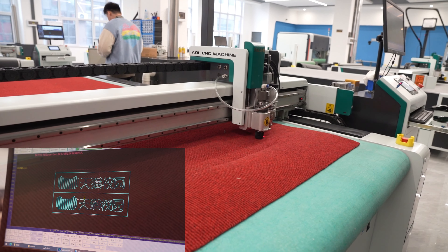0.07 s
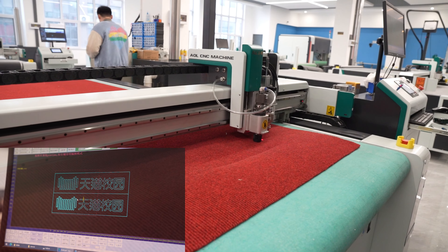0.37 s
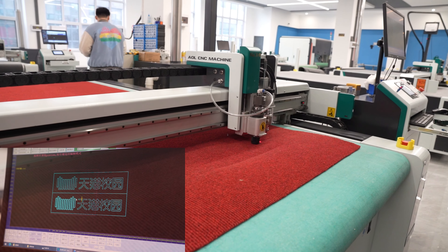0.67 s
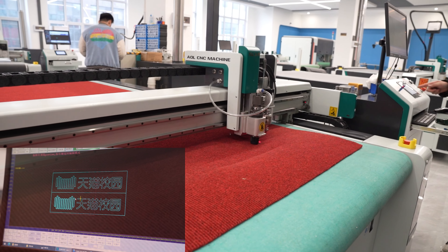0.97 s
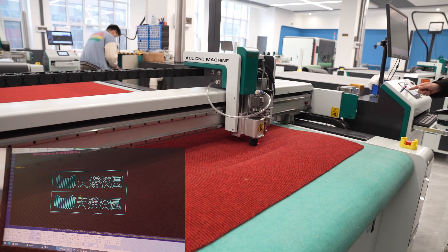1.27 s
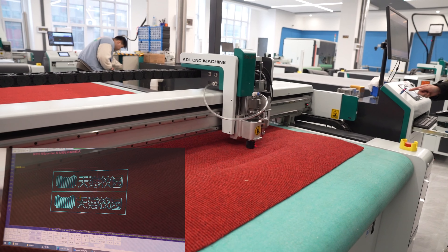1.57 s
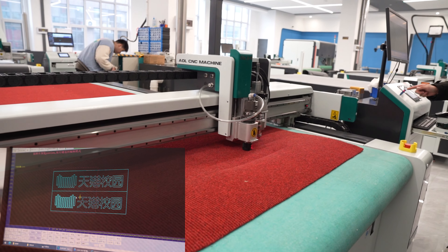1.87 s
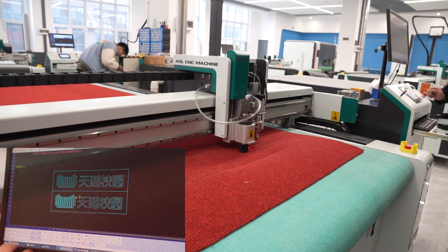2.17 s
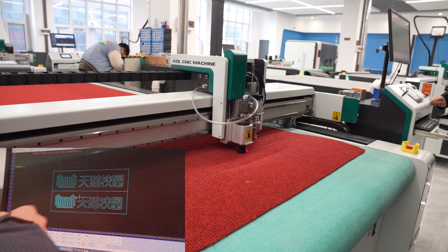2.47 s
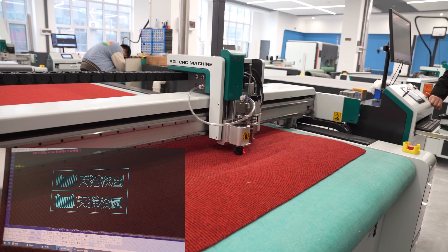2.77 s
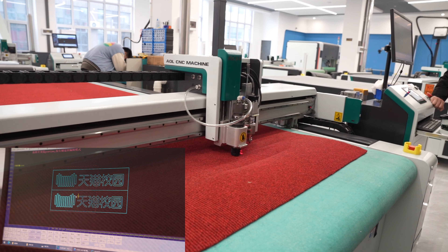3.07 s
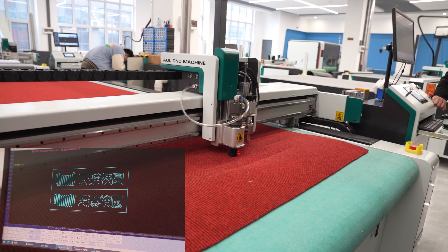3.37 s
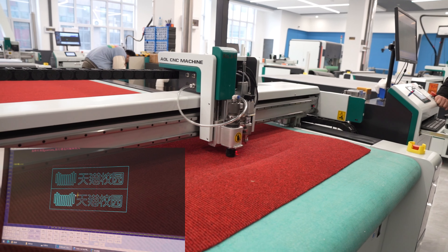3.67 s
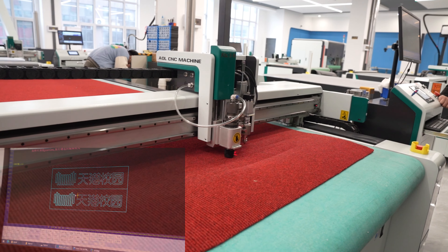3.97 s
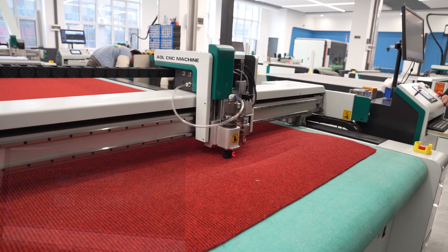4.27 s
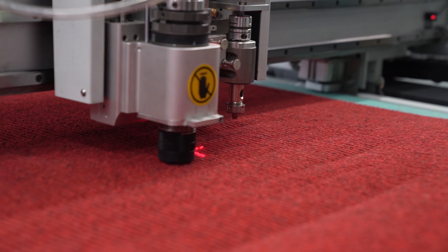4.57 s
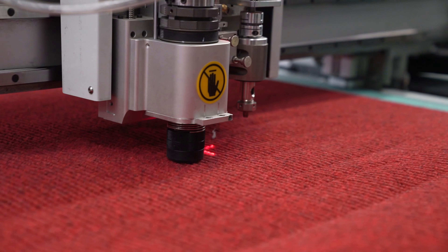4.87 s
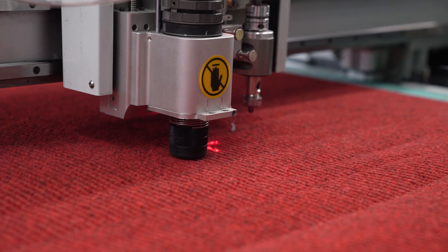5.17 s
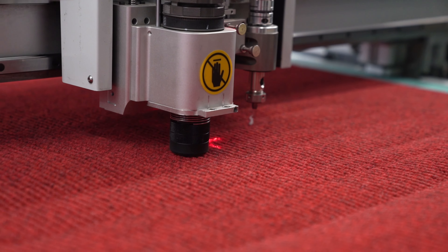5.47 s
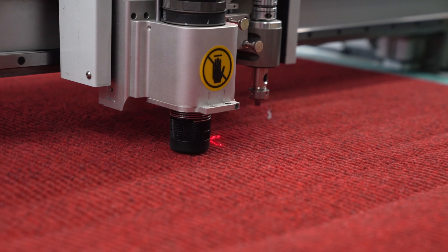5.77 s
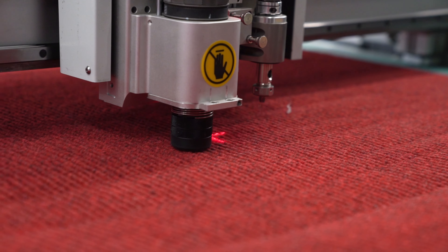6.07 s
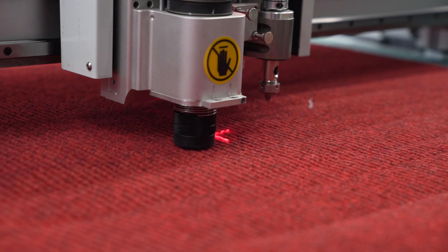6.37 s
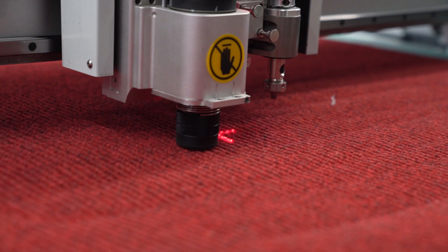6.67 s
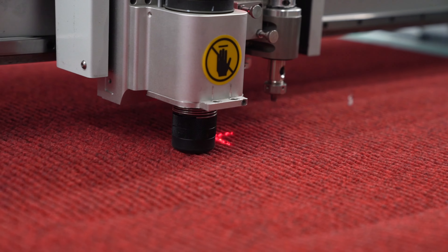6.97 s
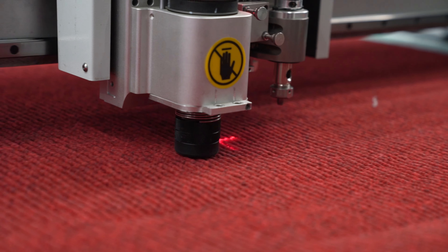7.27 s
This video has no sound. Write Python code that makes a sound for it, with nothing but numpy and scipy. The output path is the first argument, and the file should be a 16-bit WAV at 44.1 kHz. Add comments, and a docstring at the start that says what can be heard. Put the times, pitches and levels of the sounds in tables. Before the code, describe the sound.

In a workshop, a flatbed cutter's oscillating knife buzzes through carpet with a slight fast throb, over a steady bright air hiss and a low vacuum rush. Heard from beside the table, the buzz is reverberant and slowly brightens, and the blade gives a few thin squeaks. A little past halfway the sound dips for an instant, then continues close to the cutting head, drier and more distinct.

```python
"""Flatbed cutter on carpet

An oscillating knife buzzes at about 196 strokes a second, its rate hunting about ten times a second.
Air hisses at the head, the vacuum bed rumbles and the blade squeaks in a turn. The cutter is heard
from beside the table in a workshop, then, after a brief dip in level, from close to the head."""
import sys
import numpy as np
from scipy import signal
from scipy.fft import rfft
from scipy.io import wavfile
from scipy.ndimage import uniform_filter1d

SR = 44100
rng = np.random.default_rng(int(sys.argv[2]) if len(sys.argv) > 2 else 0)


def master(y):
    """Save y as 16-bit WAV."""
    cut = np.clip(np.atleast_2d(y).T, -1, 1)
    pcm = np.round(cut * 32767)  # scale
    wavfile.write(sys.argv[1], SR, pcm.astype(np.int16))


N = 323253
TIME = np.arange(N) / SR


def amp(db):
    """Decibels to gain."""
    return 10 ** (np.asarray(db) / 20)


def unit(x):
    """Scale to rms 1."""
    return x / np.sqrt(np.mean(x ** 2) + 1e-20)


def bell(x, centre, width):
    """Gaussian bump of height 1."""
    return np.exp(-2 * ((x - centre) / width) ** 2)


def at_hz(points, hz):
    """Interpolate a spectrum on a log-frequency axis."""
    f, value = np.transpose(points)
    return np.interp(np.log(hz + 1), np.log(f + 1), value)


def curves(rows):
    """Interpolate each column of a timed table per sample."""
    times, *columns = np.transpose(rows)
    return [np.interp(TIME, times, column) for column in columns]


def wander(hz):
    """Smooth random drift of rms 1, bandwidth about hz."""
    times = TIME[::64]
    f = np.fft.rfftfreq(len(times), times[1])
    spectrum = rfft(rng.standard_normal(len(times))) * np.exp(-(f / hz) ** 2)
    return np.interp(TIME, times, unit(np.fft.irfft(spectrum, len(times))))


def panned(db):
    """Stereo gains for a left-minus-right level."""
    return amp(np.array([np.atleast_1d(db), -np.atleast_1d(db)]) / 2)


# Workshop decay: freq_hz, t60_s
ROOM_DECAY = [(200, 1), (1000, 1), (4000, 0.15)]
# Reflection spectrum: freq_hz, relative_db
ROOM_COLOUR = [(200, -104), (500, 22.5), (1000, 28.5), (2000, 31.5)]


def workshop(source):
    """Dense reflections, different at each ear; bass enters weakly, treble dies first."""
    taps = rng.standard_normal((2, SR // 2)) * (rng.random((2, SR // 2)) < .05)
    hz, age_s, bands = signal.stft(taps, nperseg=256, fs=SR)
    decay = np.exp(-np.log(1000) * age_s / at_hz(ROOM_DECAY, hz)[:, None])
    bands *= amp(at_hz(ROOM_COLOUR, hz))[:, None] * decay
    tail = signal.istft(bands, nperseg=256)[1]
    return signal.fftconvolve(source.mean(0)[None], tail / np.linalg.norm(tail[0]), axes=1)[:, :N]


# Air noise likeness between the ears: freq_hz, correlation
AIR_COHERENCE = [(60, 0.35), (130, 1), (260, 1), (500, 0.92), (1000, 1), (2500, 0.81), (5000, 0.41),
                 (9000, 0.45), (12000, 0.26), (15000, 0.54)]
# Air noise balance: freq_hz, left_minus_right_db
AIR_BALANCE = [(300, 0), (1000, -.4), (4000, 1), (6300, -.6), (8500, -1.8), (12500, 1.3)]


def air_noise(spectrum, patchy_db, drift_db, peaks=()):
    """Turbulent stereo noise with quick patches; shifting reflections slowly ripple its colour."""
    frames, hz = N // 256 + 5, np.fft.rfftfreq(1024, 1 / SR)
    left_re, left_im, other_re, other_im, patches, drift = rng.standard_normal((6, frames, len(hz)))
    patches = unit(uniform_filter1d(uniform_filter1d(patches, size=9, axis=0), size=30, axis=1))
    drift = unit(uniform_filter1d(uniform_filter1d(drift, size=160, axis=0), size=5, axis=1))
    coherence = np.clip(at_hz(AIR_COHERENCE, hz), 0, 1)
    left = left_re + 1j * left_im
    right = coherence * left + np.sqrt(1 - coherence ** 2) * (other_re + 1j * other_im)
    colour_db = at_hz(spectrum, hz) + sum(db * bell(hz, centre, width) for centre, width, db in peaks)
    bands = np.array([left, right]) * amp(colour_db + patchy_db * patches + drift_db * drift)
    bands *= panned(at_hz(AIR_BALANCE, hz))[:, None]
    noise = signal.istft(bands.transpose(0, 2, 1), nperseg=1024, noverlap=768)[1][:, :N]
    return noise / np.std(noise.mean(0))


# Air flow, for blower and hiss: time_s, level_db
AIR_FLOW = [(0, -19), (4.3, -18.5), (4.55, -20.5), (5.7, -18.5), (6.25, -22.5), (7.3, -20.5)]
# Blower and duct spectra: freq_hz, relative_db
VACUUM_FAR = [(30, -39), (75, -32), (100, -35), (135, -16.5), (185, 0), (280, -3.3), (350, -8.5),
              (500, -11), (750, -13), (1300, -10), (1850, -11), (2300, -7), (3000, -15), (3800, -35)]
VACUUM_NEAR = [(30, -39), (75, -33), (100, -30), (130, -11), (190, 0), (240, -2.3), (340, -3.8), (520, -12),
               (900, -14), (1400, -7), (1850, -8), (2400, -5.5), (3000, -11), (3800, -33)]


def blower(spectrum):
    """The vacuum's low rush follows the air flow."""
    return amp(curves(AIR_FLOW)[0]) * air_noise(spectrum, patchy_db=.7, drift_db=.8)


# Hiss spectra: freq_hz, relative_db
HISS_COLOUR_FAR = [(1650, -56), (2800, -7.5), (3400, -12.5), (3950, -5.5), (4450, -9), (5000, -6),
                   (7000, -4), (8250, -5.5), (8800, 0.5), (10000, 0.5), (11900, -2), (13200, -1.5),
                   (15000, -5.5), (15700, -5)]
HISS_COLOUR_NEAR = [(1650, -28), (2900, -14.5), (4100, -7.5), (4700, -9), (5600, -5.5), (6500, -3),
                    (7000, -6.5), (8750, -6), (9100, -2.5), (10300, -0.5), (10800, -3.5), (12500, -2.5),
                    (14600, -2.5), (15700, -14)]
# Narrow bright bands: centre_hz, width_hz, lift_db
HISS_PEAKS_FAR = [(5920, 160, 3), (7680, 610, 3), (8850, 450, 0.5), (11070, 220, 1.5), (12280, 260, 6.5),
                  (13600, 600, 3.5), (14400, 300, 3)]
HISS_PEAKS_NEAR = [(5900, 210, 1.4), (7760, 410, 2), (9500, 410, 2.3), (10770, 210, 2.9), (11280, 400, 5.7),
                   (12550, 380, 3.3), (14500, 390, 2.2)]
# Hiss position, right of centre: time_s, left_minus_right_db
HISS_PAN = [(0, -4.8), (2.5, -4.2), (4.2, -3.3), (4.55, -2), (5.7, -1.3), (7.3, -1.3)]


def hiss(spectrum, peaks, strokes, hunt):
    """Air rushes at the head, pulsing faintly with the strokes and the hunting drive."""
    level_db = curves(AIR_FLOW)[0] - .3 * hunt + .25 * wander(30)
    flow = amp(level_db) * (1 + .035 * np.cos(2 * np.pi * strokes))
    noise = air_noise(spectrum, patchy_db=.72, drift_db=1.17, peaks=peaks)
    return flow * panned(curves(HISS_PAN)[0]) * noise


# Blade squeaks: centre_s, width_s, level_db
SQUEAKS = [(2.99, .04, -32), (3.08, .06, -33), (3.17, .035, -25.5)]
# Squeak spectrum: freq_hz, relative_db
SQUEAK_COLOUR = [(3000, -34), (3720, -3), (3900, 5), (4120, -12), (4700, -2), (5500, -39)]


def squeaks():
    """The blade rubs in a turn: short, thin bursts of noise."""
    rub = sum(amp(db) * bell(TIME, centre, width) for centre, width, db in SQUEAKS)
    return rub * air_noise(SQUEAK_COLOUR, patchy_db=1, drift_db=1.5)


STROKE_HZ, HUNT_HZ, HUNT_SWING_HZ = 196.2, 10.56, 1.55
# Heavy stretches of the cut: centre_s, width_s, sag_hz
LOAD_SAGS = [(.9, .15, 1.2), (1.92, .3, 2.2), (4.5, .6, .6), (5.8, .2, .7)]


def drive():
    """The stroke rate hunts and sags under load; returns the running stroke count and hunting cycle."""
    hunt = np.cos(2 * np.pi * (HUNT_HZ * TIME + .17))
    swing_hz = HUNT_SWING_HZ * hunt * (1 + .25 * wander(3))
    jitter_hz = .65 * wander(16) + .9 * wander(100)
    sag_hz = sum(hz * bell(TIME, centre, width) for centre, width, hz in LOAD_SAGS)
    return np.cumsum(STROKE_HZ - sag_hz + swing_hz + jitter_hz) / SR, hunt


# Spectrum of one stroke: harmonic, relative_db
KNOCK_FAR = [(1, -17), (2, -5.5), (3, -1.9), (4, -1.6), (5, 1), (6, 2.1), (7, -3), (8, -.3), (9, -5.2),
             (10, -5.3), (11, -5.2), (12, -8), (13, -6.5), (14, -11.7), (15, -13.5), (16, -15.7), (17, -18),
             (18, -18.4), (19, -17.4), (20, -15.3)]
KNOCK_NEAR = [(1, -14.8), (2, -0.3), (3, -2.5), (4, .8), (5, -3), (6, -.1), (7, .5), (8, -2.8), (9, -2.7),
              (10, -1.6), (11, -7.3), (12, -9.8), (13, -10.3), (14, -14.8), (15, -18.0), (16, -17.5),
              (17, -17.1), (18, -18.4), (19, -20.8), (20, -19.9)]
# Broad ring, sliding as the head travels and turns: time_s, centre_hz, gain_db
RING_PATH_FAR = [(0, 600, 0), (.5, 610, 0.5), (1.15, 820, 2), (1.6, 905, -3), (2.35, 863, 10.5),
                 (2.75, 1120, -4), (3.2, 1370, 4), (3.8, 1340, 8), (4.15, 1420, -1)]
RING_PATH_NEAR = [(4.5, 760, 5.5), (5.15, 800, 3), (5.55, 1250, -5.5), (5.85, 1290, 7), (6.25, 1370, 6),
                  (6.9, 1420, 4), (7.0, 960, 6), (7.3, 980, 4)]
# Lowest (hum) and highest (rasp) partials: time_s, level_db
HUM_LEVEL = [(0, -35), (2.4, -45), (3.85, -36.5), (4.05, -31), (5.45, -35.5), (5.7, -39), (6.9, -35.5),
             (7.25, -30)]
RASP_LEVEL = [(0, -31.5), (3.5, -31.5), (4.9, -32), (5.65, -29), (6.1, -34.5), (7.2, -30.5)]
# The knife bites harder or eases off: centre_s, width_s, gain_db
KNIFE_BITES = [(.7, .06, 2.5), (1.12, .06, 3), (1.85, .05, 2), (2.25, .3, 1.2), (2.54, .06, 2.5),
               (2.77, .04, -3), (2.83, .04, 3.5), (3.02, .08, 3), (3.49, .05, 4), (3.8, .12, 2),
               (4.1, .2, -2), (4.34, .035, 7.5), (4.67, .025, -3), (4.9, .3, 1.5), (5.55, .4, -4),
               (7.3, .3, -3)]


def partial_levels(knock, ring, body_db, hum_db, rasp_db, trough_db=0, tilt_db_per_octave=0):
    """Yield (harmonic, level_db); the sliding ring, bites and cloth drag shape the middle partials."""
    ring_hz, ring_db = curves(ring)
    hum, rasp = curves(HUM_LEVEL)[0] + hum_db, curves(RASP_LEVEL)[0] + rasp_db
    bite_db = sum(db * bell(TIME, centre, width) for centre, width, db in KNIFE_BITES)
    load_db = bite_db + .65 * wander(hz=14)  # surges from the cloth's drag
    for harmonic, colour_db in knock:
        hz = harmonic * STROKE_HZ
        if harmonic <= 2:
            level_db = hum
        elif harmonic >= 11:
            level_db = rasp
        else:
            ringing_db = ring_db * bell(hz, ring_hz, width=204)
            # A reflection off the table cancels partials just below the ring.
            cancelled_db = trough_db * bell(hz, ring_hz - 365, width=170)
            tilt_db = tilt_db_per_octave * np.log2(hz / 1080)
            level_db = body_db + ringing_db + cancelled_db + tilt_db
        yield harmonic, colour_db + level_db + load_db * bell(harmonic, centre=6.9, width=3.7)


def knife(strokes, hunt, partials, smear_rad, spread_rad, roughness, throb_db):
    """One knock a stroke, smeared by nearby reflections; the cloth's drag makes the knocks uneven."""
    buzz = np.zeros((2, N))
    for harmonic, level_db in partials:
        # Reflections shift the phase as the head moves; high partials differ more between the ears.
        ear_phase = np.array([[1], [-1]]) * spread_rad * np.sqrt(harmonic)
        phase = smear_rad * wander(hz=1) + ear_phase * rng.choice([-1, 1])
        depth = np.clip(1 - (level_db + 32) / 14, .4, 1.3)  # weak partials waver most
        flutter_db = 1.85 * wander(hz=26)  # changing blade load
        swell_db = .9 * wander(hz=5)  # shifting reflections
        envelope = unit(amp(depth * (flutter_db + swell_db))) * amp(level_db)
        buzz += np.sqrt(2) * envelope * np.cos(2 * np.pi * harmonic * strokes + phase)
    stroke_force = 1 + roughness * rng.standard_normal(int(strokes[-1]) + 2)
    return buzz * stroke_force[np.round(strokes).astype(int)] * amp(throb_db * hunt)


def beside_table(strokes, hunt):
    """A few steps away: air noise and a reverberant buzz that brightens as the head travels."""
    partials = partial_levels(KNOCK_FAR, RING_PATH_FAR, body_db=-33, hum_db=6, rasp_db=1,
                              trough_db=-3.5, tilt_db_per_octave=2 * (TIME - 2.35))
    buzz = knife(strokes, hunt, partials, smear_rad=.95, spread_rad=.1, roughness=.07, throb_db=1.15)
    cutting = buzz * panned(-1.5) + amp(-8.5) * workshop(buzz)
    rumble = amp(-11) * blower(VACUUM_FAR)
    air = amp(-.28) * hiss(HISS_COLOUR_FAR, HISS_PEAKS_FAR, strokes, hunt)
    return rumble + air + squeaks() + cutting


def at_head(strokes, hunt):
    """Close to the knife: drier, more distinct knocks over the air noise."""
    partials = partial_levels(KNOCK_NEAR, RING_PATH_NEAR, body_db=-30, hum_db=4, rasp_db=3)
    buzz = knife(strokes, hunt, partials, smear_rad=.72, spread_rad=.11, roughness=.03, throb_db=1.1)
    cutting = buzz * panned(-1.2) + amp(-15) * workshop(buzz)
    rumble = amp(-12) * blower(VACUUM_NEAR)
    air = hiss(HISS_COLOUR_NEAR, HISS_PEAKS_NEAR, strokes, hunt)
    return rumble + air + cutting


def scene():
    """Two listening positions in turn, with a brief dip between them."""
    move_s = 4.372
    strokes, hunt = drive()
    far, near = beside_table(strokes, hunt), at_head(strokes, hunt)
    dip = np.interp(TIME - move_s, [-.012, -.003, .002, .026], [1, .12, .12, 1])
    return np.where(TIME < move_s, far, near) * dip


# Bass cut: freq_hz, gain_db
BASS_CUT = [(30, -3), (70, -2.5), (100, -6.5), (125, -8), (160, -2), (230, 0)]


def record(dry):
    """Thin bass and a steep treble limit."""
    response = amp(at_hz(BASS_CUT, np.fft.rfftfreq(N, 1 / SR)))
    thinned = np.fft.irfft(np.fft.rfft(dry) * response, N)
    lowpass = signal.firwin(511, cutoff=15800, window=("kaiser", 9), fs=SR)
    return signal.oaconvolve(thinned, lowpass[None], "same")


dry = scene()
out = record(dry)
master(out)
```